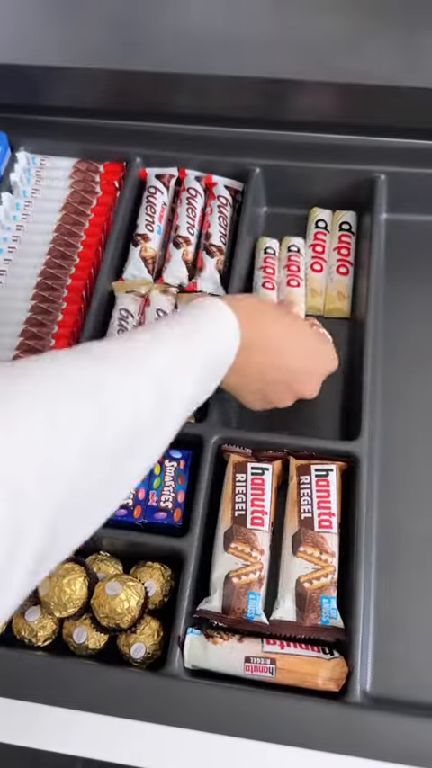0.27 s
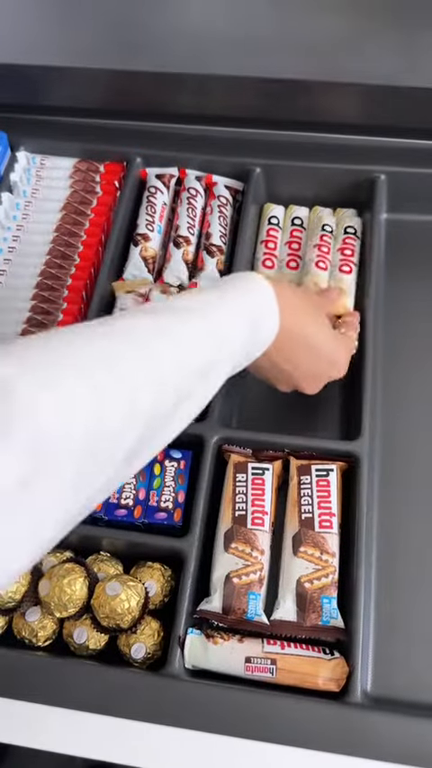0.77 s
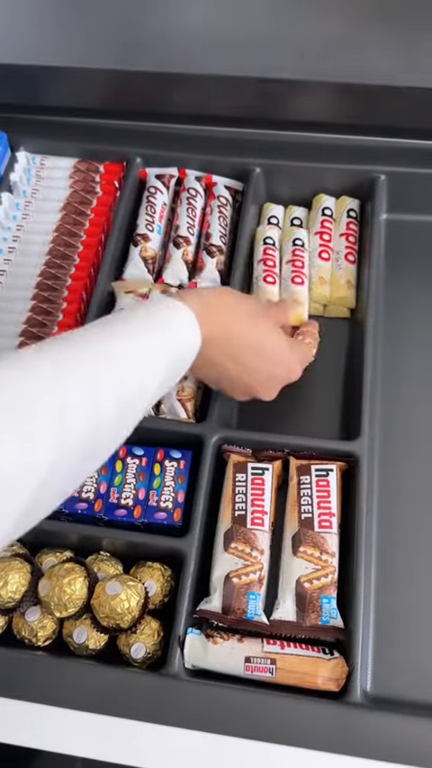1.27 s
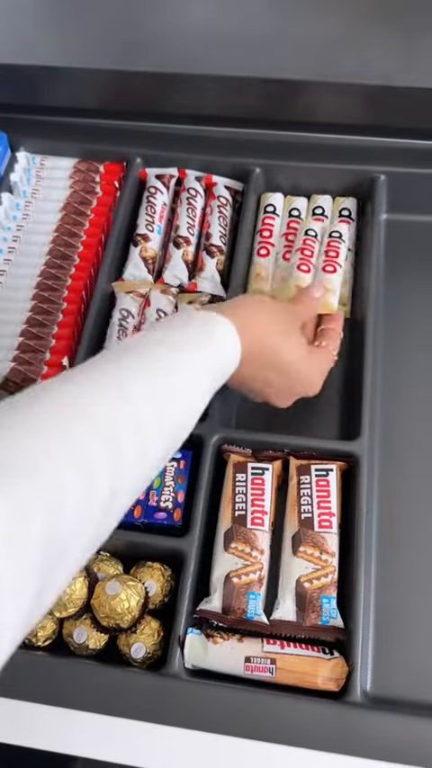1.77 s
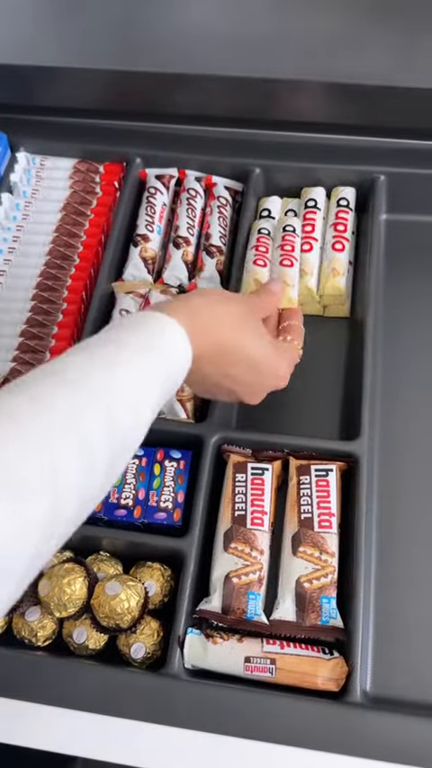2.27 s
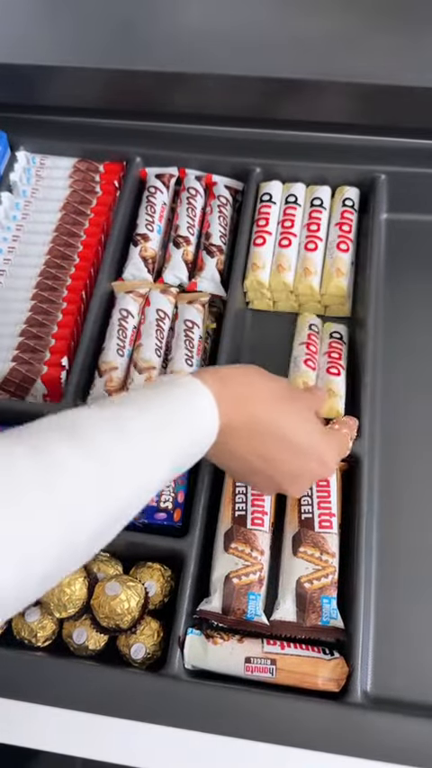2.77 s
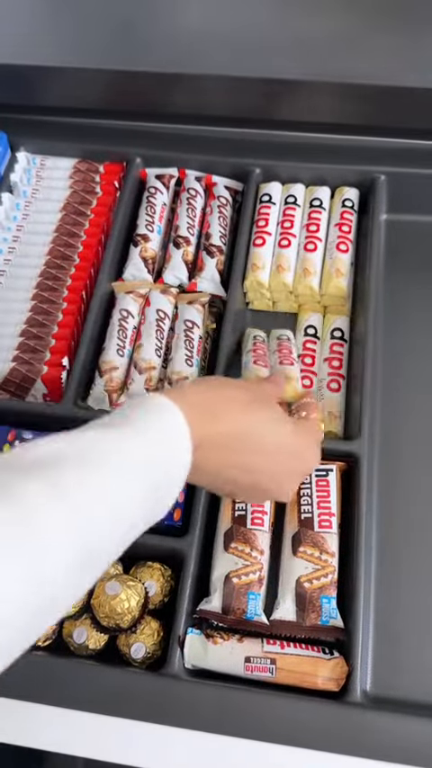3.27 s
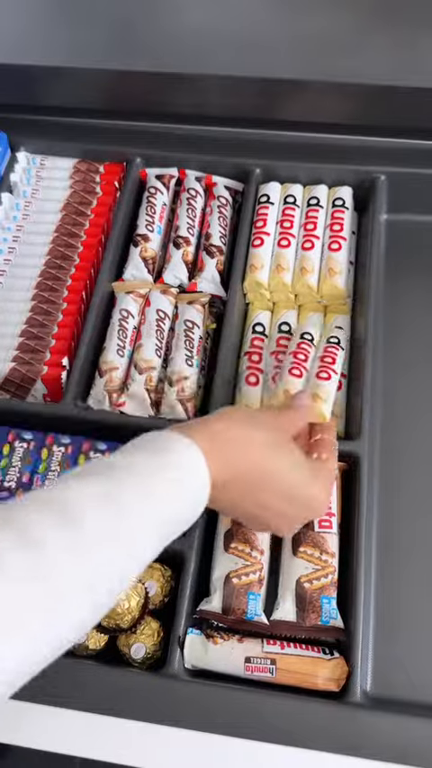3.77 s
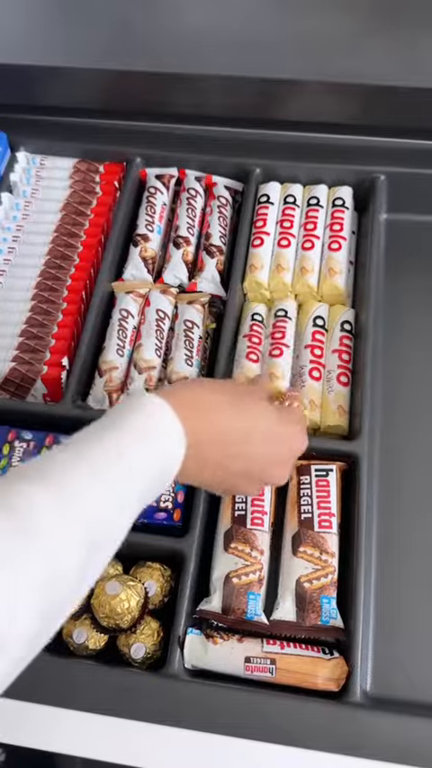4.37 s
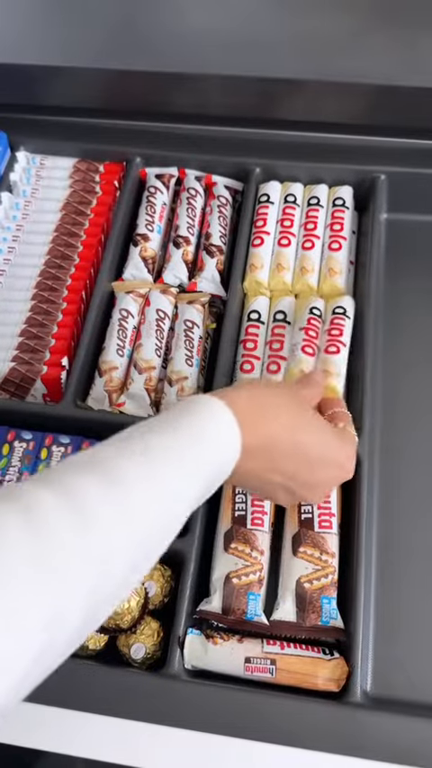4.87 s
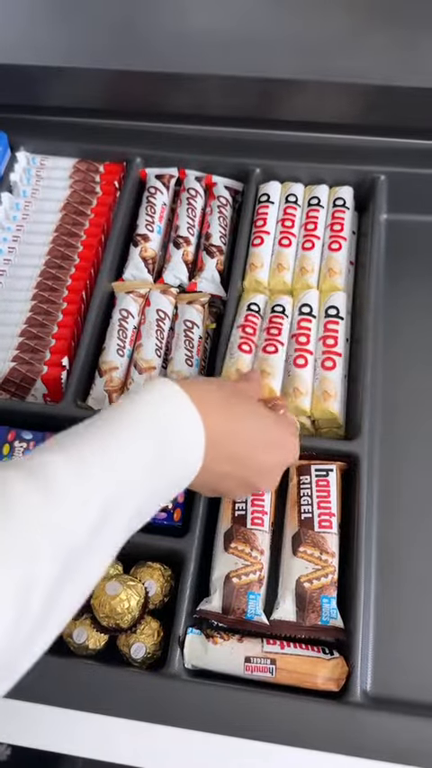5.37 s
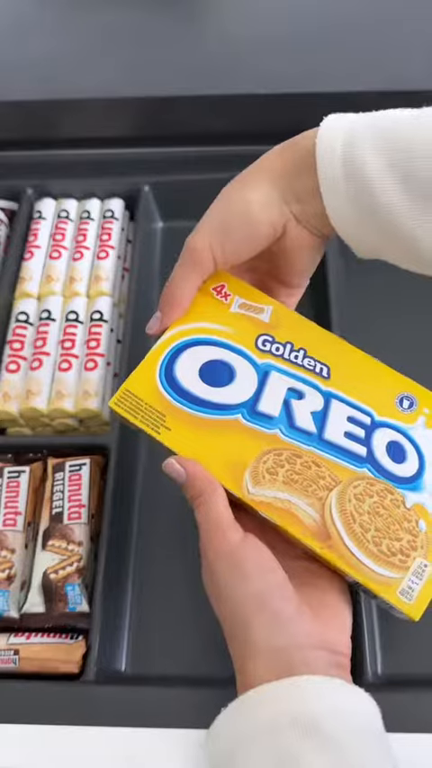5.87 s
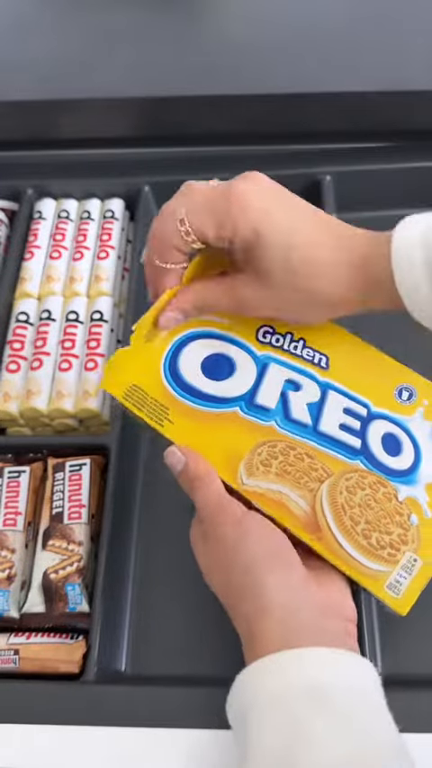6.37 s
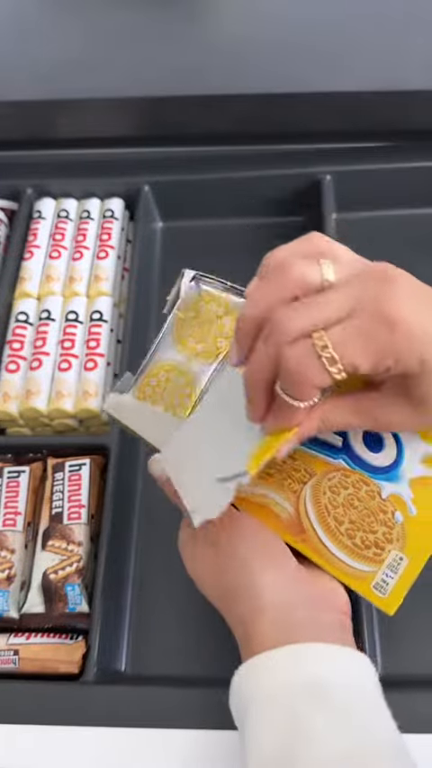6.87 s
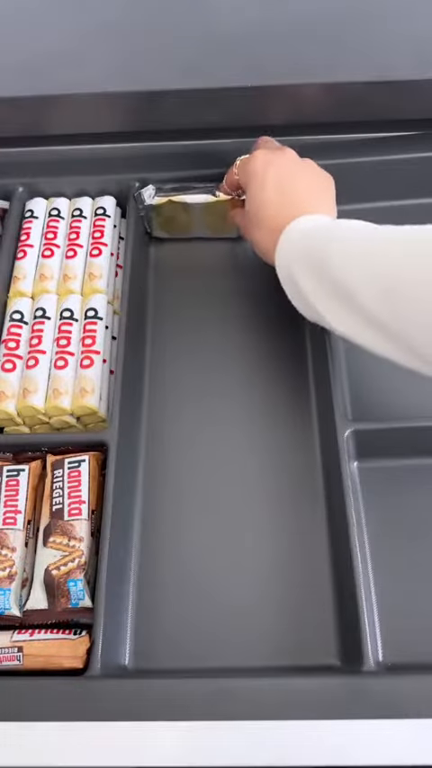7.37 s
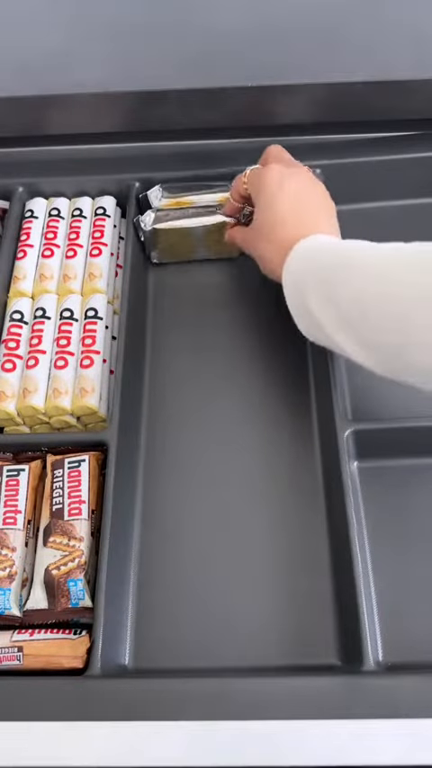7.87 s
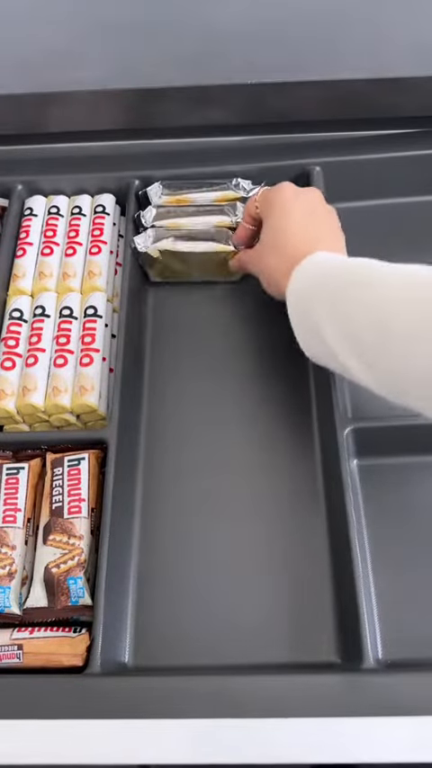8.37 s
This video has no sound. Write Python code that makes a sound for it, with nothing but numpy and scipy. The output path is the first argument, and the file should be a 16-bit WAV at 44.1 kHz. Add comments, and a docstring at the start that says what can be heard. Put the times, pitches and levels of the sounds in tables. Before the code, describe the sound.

Close-up knocks and short slides of wrapped snacks in a plastic organiser, followed by ripping cardboard and sharp crinkling plastic film, abruptly cut together.

```python
"""In a live room, close by, foil-wrapped chocolate bars are laid and pushed into a plastic drawer organiser.
Then a cardboard box is torn open and biscuit packs in crisp plastic film are stood in the next compartment.
Knocks are struck modes and decaying noise; sliding, foil, card and film are crowds of tiny ringing grains.
The scene is a string of short shots: at each splice the sources stop dead, ring and room tail with them,
and only a quiet bed of air runs on."""
import sys
import numpy as np
from scipy import signal
from scipy.fft import rfft, irfft
from scipy.io import wavfile

SR = 44100
rng = np.random.default_rng(int(sys.argv[2]) if len(sys.argv) > 2 else 0)


def pcm_store(signal):
    """Save signal as 16-bit PCM."""
    levels = np.round(np.clip(np.atleast_2d(signal), -1, 1) * 32767)
    wavfile.write(sys.argv[1], SR, levels.astype(np.int16).T)


N = 380141  # samples

# Event levels below are cue levels; scene() trims each layer. Colours are relative spectra.

# Ring of the tray in its drawer: (mode [Hz], relative level [dB], decay time t60 [s])
TRAY = [(173, -18.5, 0.12), (220.4, -15.5, 0.068), (316.6, -3, 0.2), (407, -3.5, 0.071), (425, 0.5, 0.14),
        (445, -1, 0.058), (523, -9.5, 0.17), (593.4, -7, 0.15)]


def tray_ring(vary_db, detune, size=16384):
    """The tray's answer to one touch: the spot sets each mode's share, the load of packs shifts its pitch."""
    hz, db, t60 = np.transpose(TRAY)[:, :, None]
    t = np.arange(size) / SR
    signs = rng.choice([-1, 1], hz.shape)
    share = signs * amp(db + vary_db * rng.standard_normal(hz.shape))
    hz = hz * (1 + detune * rng.standard_normal(hz.shape))
    modes = share * amp(-60 * t / t60) * np.sin(2 * np.pi * hz * t)
    return peak_one(modes.sum(axis=0))


# A pack or the box is knocked, on the tray, on a neighbour or in the hand:
# (time [s], clack level [dB], thud level [dB], wrapper tick level [dB], ring of the struck spot [Hz])
KNOCKS = [(0.002, -18.5, -31, -49.5, 810), (0.15, -38.5, -38.5, -48, 830), (0.378, -28.5, -52, -63, 1140),
          (0.393, -13, -15, -44, 1356), (0.664, -23, -61, -44.5, 880), (0.94, -47, -41.5, -66, 530),
          (1.02, -20.5, -46, -44.5, 754), (1.156, -36.5, -36, -54, 1170), (1.363, -36.5, -53, -63, 740),
          (1.393, -34, -37, -59, 750), (1.521, -28, -41.5, -54, 860), (1.589, -22, -31.5, -50, 940),
          (1.926, -51, -43.5, -65, 1050), (2.029, -42.5, -36, -51.5, 1080), (2.189, -44, -41, -70, 570),
          (2.356, -40, -28, -49, 715), (2.519, -37.5, -40, -55.5, 750), (2.62, -35, -37.5, -60, 990),
          (2.672, -52, -41.5, -55, 770), (2.951, -28.5, -22, -76, 1140), (3.004, -18.5, -18, -44, 1012),
          (3.068, -33, -33, -46.5, 1000), (3.174, -33, -33, -59, 1000), (3.25, -27.5, -48, -59.5, 1030),
          (3.599, -9, -21, -41, 1003), (3.607, -14.5, -12.5, -54, 900), (3.748, -50, -37.5, -54, 1030),
          (3.817, -40, -48, -50, 930), (3.939, -36, -44, -65, 950), (4.136, -38, -38, -45, 990),
          (4.16, -21.5, -31, -46.5, 617), (4.458, -40, -39.5, -78, 990), (4.633, -33, -32.5, -44, 670),
          (4.836, -64, -52.5, -66.5, 1026), (5.065, -41, -38, -50.5, 755), (5.122, -20, -49, -39, 1010),
          (5.142, -26, -28, -45, 870), (5.244, -35.5, -37.5, -74, 960), (5.607, -45.5, -49.5, -63, 1030),
          (5.643, -49, -40.5, -59, 827), (6.089, -18, -30, -47, 1260), (6.358, -42, -33.5, -52, 1200),
          (6.734, -19.5, -29, -30, 854), (7.124, -39, -38, -58, 1810), (7.247, -28, -61, -36.5, 2040),
          (7.339, -36, -39, -55, 1150), (7.41, -37.5, -77, -42.5, 1830), (7.621, -32, -37, -30, 2550),
          (7.713, -24.5, -29, -52.5, 1283), (8.171, -29.5, -40.5, -46, 640), (8.297, -34, -31, -50, 1930)]
# Colour of the thudding pack, also of the sliding rumble: (frequency [Hz], level [dB])
THUD = [(60, -10), (100, -17.5), (170, 0.5), (400, 2.5), (600, -3), (900, -11.5), (2500, -58.5)]
# Colour of the hard clack: (frequency [Hz], level [dB])
CLACK = [(200, -14), (500, 4.5), (800, -3), (1050, -3.5), (1160, -2), (1420, -2.5), (1750, -11.5),
         (2300, -11.5), (3300, -18), (4500, -28), (9000, -51.5)]
# Colour of ticking and crinkling foil: (frequency [Hz], level [dB])
FOIL_HISS = [(700, -30.5), (2000, -1), (3500, -5.5), (5000, -6), (6400, -2), (8000, -6.5), (10200, -10.5),
             (12000, -30.5), (16000, -6)]


def knocks(boom_db, thud_db, clack_db, spot_db, tick_db):
    """A pack lands: the wrapper ticks, the struck spot rings, the floor clacks, the pack thuds and the tray booms."""
    out = np.zeros(N)
    for s, clack, thud, tick, spot_hz in KNOCKS:
        add(out, s, amp(thud + boom_db) * tray_ring(vary_db=1.5, detune=0.0065))
        add(out, s, amp(thud + thud_db) * burst(THUD, t60=0.12, rise_s=0.0015))
        add(out, s, amp(clack + clack_db) * burst(CLACK, t60=0.067, rise_s=0.00016))
        add(out, s, amp(clack + spot_db) * ping(spot_hz, t60=.03))
        add(out, s, amp(tick + tick_db) * burst(FOIL_HISS, t60=0.1, rise_s=0.00037))
    return out


# A pack is pushed along the tray:
# (time [s], length [s], tray rumble level [dB], wrapper scuff level [dB])
PUSHES = [(0, 0.027, -27.5, -37), (.145, 0.2, -37, -52), (.42, 0.051, -29.5, -46.5),
          (.665, 0.094, -44.5, -51), (.79, 0.12, -50, -55.5), (1.0, 0.068, -41, -55),
          (1.165, 0.061, -49, -53.5), (1.375, 0.052, -47.5, -48.5), (1.48, 0.22, -62, -62),
          (1.72, 0.41, -71.5, -71), (2.09, 0.17, -61, -62.5), (2.18, 0.036, -36.5, -54.5),
          (2.215, 0.14, -35.5, -48.5), (2.38, 0.058, -45.5, -58), (2.53, 0.15, -50, -66.5),
          (2.68, 0.16, -35.5, -50.5), (3.01, 0.037, -27.5, -48.5), (3.175, 0.088, -35, -46),
          (3.245, 0.11, -34.5, -47), (3.81, 0.081, -47, -54), (4.186, 0.23, -52.5, -58.5),
          (4.44, 0.39, -69, -67), (4.605, .03, -53, -51.5), (5.194, .04, -56, -70),
          (5.245, 0.091, -45, -55), (5.38, .1, -58.5, -61), (7.125, 0.026, -34, -60)]
# Colour of the rubbing wrapper: (frequency [Hz], level [dB])
SCUFF = [(150, -7), (500, -17), (850, 8.5), (1400, 0), (2000, -4), (3200, -10), (5000, -22), (12000, -45.5)]


def sliding(ring_db, rumble_db, scuff_db):
    """Stick and slip of a pushed pack: a scuff, a dull lumpy rumble, and the tray's modes kept ringing."""
    push, scuff = strokes(PUSHES, attack_s=0.0089, sag_db_per_s=20.5, release_db_per_s=220)
    slips = grains(per_s=640, spread_db=2.5)
    ringing = rms_one(signal.oaconvolve(slips, tray_ring(vary_db=2.5, detune=0))[:N])
    rumble = crackle(THUD, per_s=2200, spread_db=2.5, clump_db=9.5, q=8.8)
    # a negative spread: most slips are strong, a few weak
    rubbing = crackle(SCUFF, per_s=4300, spread_db=-1.0, clump_db=4.5)
    tray = amp(ring_db) * ringing + amp(rumble_db) * rumble
    return push * tray + amp(scuff_db) * scuff * rubbing


# A foil bar brushes its neighbours: (time [s], length [s], crinkle level [dB])
BRUSHES = [(0, 0.013, -56), (.15, 0.27, -64), (.67, 0.07, -56), (.87, .18, -58), (1.165, 0.34, -63),
           (1.71, 0.02, -52.5), (1.86, 0.22, -60.5), (2.24, 0.18, -62), (2.61, 0.15, -65.5),
           (3.02, 0.043, -57.5), (3.175, 0.2, -62.5), (3.75, 0.23, -67), (4.19, 0.23, -63.5),
           (4.82, 0.63, -64.5), (5.194, 0.23, -63), (5.365, 0.054, -59), (5.605, .09, -60.5),
           (5.71, 0.034, -63.5)]


def foil(crinkle_db):
    """Soft foil crinkles finely against its neighbours."""
    crinkle, = strokes(BRUSHES, attack_s=0.005, sag_db_per_s=4.5, release_db_per_s=161.5)
    return amp(crinkle_db) * crinkle * crackle(FOIL_HISS, per_s=3000, spread_db=2.5, clump_db=4.0)


# A crease of foil, card or film snaps over: (time [s], crack level [dB], body level [dB])
SNAPS = [(0.7213, -37.5, -49), (0.88, -36, -59), (1.8782, -34, -40.5), (3.7958, -37.5, -61),
         (3.925, -38, -52), (4.341, -38.5, -50), (4.908, -49, -67), (5.914, -32.5, -36.5),
         (5.9457, -25, -31), (6.023, -29.5, -17.5), (6.0501, -24.5, -30), (6.0632, -22, -21),
         (6.075, -18, -16.5), (6.0888, -38, -23), (6.1068, -19, -10), (6.1932, -26, -22),
         (6.3024, -32.5, -30), (6.344, -30, -26), (6.359, -33, -13.5), (6.401, -46, -21),
         (6.4886, -25, -16.5), (6.7347, -45, -16), (6.7629, -31, -12.5), (6.7743, -25, -21),
         (6.946, -40, -30.5), (6.997, -28, -38.5), (7.0417, -28, -33), (7.1041, -22, -40),
         (7.235, -27, -30), (7.5237, -37, -49), (7.6826, -31, -27), (7.7298, -23.5, -45), (7.972, -35, -44),
         (8.081, -33.5, -68.5), (8.1248, -24.5, -56), (8.1738, -18, -37), (8.2258, -28, -44),
         (8.2713, -17.5, -27), (8.2961, -16, -38), (8.3598, -33, -32.5), (8.521, -33.5, -37),
         (8.5695, -31, -31), (8.58, -30, -33)]
# Colour of the spray of cracks: (frequency [Hz], level [dB])
SNAP_CRACK = [(800, -27), (2500, 3), (4000, -5), (6500, 7), (9500, -2.5), (16000, -15)]
# Colour of a snap's body and of the tearing box wall: (frequency [Hz], level [dB])
CARD_BODY = [(120, -29.5), (250, 0), (500, 3.5), (800, -2), (1300, 4.5), (2000, -2.5), (3000, -3.5),
             (5000, -16.5), (12000, -48)]
# Colour of a snap's click and of the larger film facets: (frequency [Hz], level [dB])
FILM_BODY = [(150, -3.5), (600, -2.5), (1300, -1), (2600, 1), (3600, -4), (6000, -5), (12000, -53)]


def snaps(click_db, crack_db, body_db, ring_db):
    """A crease buckles: one sharp click, a spray of cracks, a short body and a brief ring of the sheet around it."""
    out = np.zeros(N)
    click = peak_one(colour(signal.unit_impulse(512), FILM_BODY))
    for s, crack, body in SNAPS:
        crease_hz = np.exp(rng.uniform(np.log(1200), np.log(6400)))  # each crease has its own pitch
        add(out, s, amp(body + click_db) * click)
        add(out, s, amp(crack + crack_db) * burst(SNAP_CRACK, t60=0.026, rise_s=0.00086))
        add(out, s, amp(body + body_db) * burst(CARD_BODY, t60=0.024, rise_s=0.0014))
        add(out, s, amp(crack + ring_db) * ping(crease_hz, t60=.012))
    return out


# One pull at the card box: (time [s], length [s], tearing level [dB], fibre crackle level [dB])
PULLS = [(5.875, .03, -62, -56.5), (5.905, 0.07, -53, -52.5), (6.05, 0.072, -47.5, -36),
         (6.14, .07, -52, -61), (6.3, 0.031, -43, -47), (6.345, 0.032, -34, -43), (6.4, 0.09, -33.5, -36),
         (6.51, 0.44, -40, -38.5), (6.72, 0.23, -40, -42.5)]
# Colour of breaking fibres and of film creases: (frequency [Hz], level [dB])
FILM_HISS = [(800, -29), (2500, -1), (4200, -4), (6500, -0.5), (9000, -2.5), (11500, -17.5), (16000, -5)]


def card(tear_db, fibre_db):
    """Fibres part in ragged runs; the box wall crackles lower down."""
    tear, fibre = strokes(PULLS, attack_s=0.0082, sag_db_per_s=15.5, release_db_per_s=252)
    wall = crackle(CARD_BODY, per_s=3000, spread_db=3.2, clump_db=2.8, q=5.0)
    breaks = crackle(FILM_HISS, per_s=5000, spread_db=3.0, clump_db=2.0)
    return amp(tear_db) * tear * wall + amp(fibre_db) * fibre * breaks


# A film pack is gripped, stood up or let go:
# (time [s], length [s], rustle level [dB], crinkle level [dB])
GRIPS = [(6.91, .03, -55, -60.5), (6.945, 0.096, -41.5, -48), (7.105, 0.036, -39.5, -39.5),
         (7.25, 0.15, -45, -52), (7.42, 0.078, -58, -63.5), (7.52, 0.19, -49, -55),
         (7.62, 0.079, -38.5, -41.5), (7.75, 0.048, -47, -46), (7.87, 0.026, -44, -45.5),
         (7.92, 0.29, -57.5, -41), (8.12, 0.038, -59, -40), (8.2, 0.077, -40, -56), (8.29, .12, -37, -44),
         (8.422, 0.0082, -51, -47), (8.55, .07, -53.5, -55)]


def film(rustle_db, crinkle_db):
    """Stiff film buckles in fewer, sharper steps; its larger facets ring briefly."""
    rustle, crinkle = strokes(GRIPS, attack_s=0.0034, sag_db_per_s=26, release_db_per_s=245)
    facets = crackle(FILM_BODY, per_s=1500, spread_db=3.8, clump_db=3.0, q=8.0)
    creases = crackle(FILM_HISS, per_s=2500, spread_db=4.2, clump_db=3.2)
    return amp(rustle_db) * rustle * facets + amp(crinkle_db) * crinkle * creases


# Decay of the room: (frequency [Hz], decay time t60 [s])
ROOM_T60 = [(150, 0.44), (400, .5), (1000, 0.35), (2800, 0.4), (7000, 0.49), (15000, 0.36)]
# Stereo width of the room: (frequency [Hz], side minus mid level [dB])
ROOM_WIDTH = [(120, -17.5), (300, -16.5), (550, -2.5), (1000, -2), (2000, -5.5), (8000, -0.5)]


def room_response(build_s, size=28000):
    """Diffuse stereo tail, mid at unit energy: dies octave by octave, nearly mono in the bass."""
    t = np.arange(size) / SR
    hz = np.arange(size // 2 + 1) * SR / size
    white = rfft(rng.standard_normal((2, size)))
    octave = np.clip(np.round(np.log2(np.maximum(hz, 1) / 125)), 0, 7)
    tail = np.zeros((2, size))
    for k in np.unique(octave):
        t60 = at_hz(ROOM_T60, 125 * 2 ** k)  # read at the octave's centre
        tail += irfft(white * (octave == k)) * amp(-60 * t / t60)
    mid, side = tail * (1 - np.exp(-t / build_s))
    side = irfft(rfft(side) * amp(at_hz(ROOM_WIDTH, hz)))
    return np.array([mid + side, mid - side]) / np.sqrt(np.sum(mid ** 2))


# The shots: (start [s], end [s])
SHOTS = [(0, 1.664), (1.704, 3.68), (3.743, 4.183), (4.186, 4.684), (4.8, 5.191), (5.194, 5.702),
         (5.705, 6.909), (6.91, 7.416), (7.419, 7.918), (7.92, 8.42), (8.422, 8.62)]


def spliced(direct, to_room, fade_s):
    """Each shot has its own room tail and ends in a very short fade."""
    out = np.zeros((2, N))
    room = room_response(build_s=0.0043)
    for start, end in SHOTS:
        a, b = round(start * SR), min(round(end * SR), N)
        tail = signal.fftconvolve(to_room[None, a:b], room, axes=1)[:, :b - a]
        fade = np.minimum(np.arange(b - a, 0, -1) / (fade_s * SR), 1)
        out[:, a:b] = (direct[a:b] + tail) * fade
    return out


# Colour of the air: (frequency [Hz], level [dB])
AIR = [(30, -12), (70, 9), (300, -14.5), (1000, -5), (16000, -23)]


def air(level_db):
    """Steady, mostly low noise of the air, unbroken under all shots."""
    return amp(level_db) * rms_one(colour(rng.standard_normal(N), AIR))


def add(track, s, sound):
    """Lays a sound in at time s; it lasts at most to the end of its shot."""
    start = round(s * SR)
    end = min([round(b * SR) for a, b in SHOTS if b > s] + [N])
    piece = sound[:max(end - start, 0)]
    track[start:start + len(piece)] += piece


def strokes(rows, attack_s, sag_db_per_s, release_db_per_s):
    """One gain curve per dB column: each hand movement swells, eases off while it lasts, then dies away."""
    rows = np.array(rows)
    t = np.arange(SR) / SR
    power = np.zeros((rows.shape[1] - 2, N))
    for s, length, *levels in rows:
        fall_db = sag_db_per_s * t + release_db_per_s * np.maximum(t - length, 0)
        shape = np.minimum(t / attack_s, 1) * amp(-fall_db)
        for track, db in zip(power, levels):
            add(track, s, (amp(db) * shape) ** 2)  # overlapping strokes add as power
    return np.sqrt(power)


def crackle(spectrum, per_s, spread_db, clump_db, q=1.53, count=16):
    """Grains come in clumps, and each rings a facet of its own size and pitch; rms 1."""
    clicks = grains(per_s, spread_db) * amp(clump_db * drift(per_s=65))
    facets_hz = np.geomspace(spectrum[0][0], spectrum[-1][0], count)
    dealt = rng.integers(0, count, N)  # which facet each grain strikes
    rings = np.zeros(N)
    for k, hz in enumerate(facets_hz):
        rings += resonate(clicks * (dealt == k), min(hz, SR / 2.5), q)
    return rms_one(colour(rings, spectrum))


def grains(per_s, spread_db):
    """Random tiny slips and snaps; with a positive spread many are weak and a few strong."""
    spread = np.minimum(rng.exponential(1, N), 3.8)
    sizes = amp(spread_db * spread) * rng.choice([-1, 1], N)
    return sizes * (rng.random(N) < per_s / SR)


def drift(per_s):
    """Bounded random wander about 0 with a spread near 1, gliding to so many new values a second."""
    knots = np.arange(N) * per_s / SR
    return np.interp(knots, np.arange(4000), rng.uniform(-1.7, 1.7, 4000))


def resonate(x, hz, q):
    """One resonance, gain 1 on top."""
    b, a = signal.iirpeak(hz, q, fs=SR)
    return signal.lfilter(b, a, x + 1e-18)  # tiny offset against denormal numbers


def burst(spectrum, t60, rise_s, size=8192):
    """Coloured dying noise, like a crowd of short-lived modes struck at once; its decay starts near rms 1."""
    t = np.arange(size) / SR
    dying = amp(-60 * t / t60) * (1 - np.exp(-t / rise_s))
    noise = colour(rng.standard_normal(size) * dying, spectrum)
    return rms_one(noise) * np.sqrt(np.mean(dying ** 2))


def ping(hz, t60, size=4096):
    """One mode set ringing by a click; its decay starts from height 1."""
    t = np.arange(size) / SR
    return amp(-60 * t / t60) * np.sin(2 * np.pi * hz * t)


def colour(x, spectrum, size=2048):
    """Causal (minimum-phase) filter with the given spectrum, falling away below its first point."""
    hz = np.arange(size // 2 + 1) * SR / size
    low_fall = np.clip(hz / spectrum[0][0], .1, 1) ** 2
    gain = amp(at_hz(spectrum, hz)) * low_fall
    # folding the cepstrum onto positive time makes the phase minimal
    cepstrum = irfft(np.log(gain))
    cepstrum[1:size // 2] *= 2
    cepstrum[size // 2 + 1:] = 0
    impulse = irfft(np.exp(rfft(cepstrum)))
    return signal.oaconvolve(x, impulse)[:len(x)]


def at_hz(points, hz):
    """Reads a table on a log-frequency axis."""
    f, value = np.transpose(points)
    return np.interp(np.log(np.maximum(hz, 1)), np.log(f), value)


def amp(db):
    """Decibels to amplitude."""
    return 10 ** (np.asarray(db) / 20)


def rms_one(x):
    """Scales to rms 1."""
    return x / np.sqrt(np.mean(x ** 2) + 1e-20)


def peak_one(x):
    """Scales to peak 1."""
    return x / np.abs(x).max()


def scene():
    """Knocks fill the room most; the wrappers are heard more directly."""
    hits = knocks(boom_db=0.5, thud_db=-4, clack_db=-5.5, spot_db=-0.5, tick_db=-2.0)
    rubs = sliding(ring_db=-2, rumble_db=-4.0, scuff_db=3) + foil(crinkle_db=1.5)
    cracks = snaps(click_db=-10.0, crack_db=-4.5, body_db=-4.5, ring_db=-5.5)
    rustles = card(tear_db=1.0, fibre_db=-4) + film(rustle_db=-3.5, crinkle_db=-4.5)
    direct = hits + cracks + rubs + rustles
    to_room = amp(-3.5) * hits + amp(-7.5) * cracks + amp(-5.5) * (rubs + rustles)
    return spliced(direct, to_room, fade_s=0.00076) + air(level_db=-75)


def record(dry):
    """The microphone thins the deepest bass; the top is cut steeply."""
    low_cut_hz, top_cut_hz = 60, 16200
    low_cut = signal.butter(2, low_cut_hz, "high", fs=SR, output="sos")
    top_cut = signal.ellip(10, .2, 80, top_cut_hz, fs=SR, output="sos")  # ripple, then rejection in dB
    return signal.sosfilt(top_cut, signal.sosfilt(low_cut, dry))


dry = scene()
out = record(dry)
pcm_store(out)
```